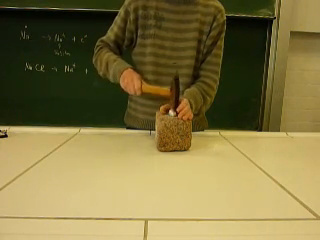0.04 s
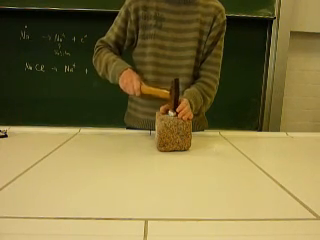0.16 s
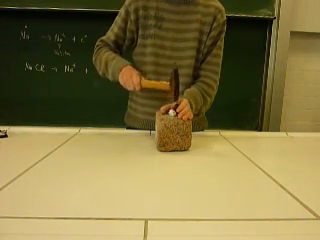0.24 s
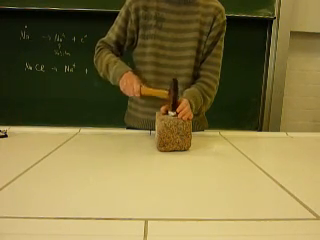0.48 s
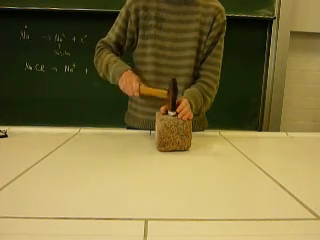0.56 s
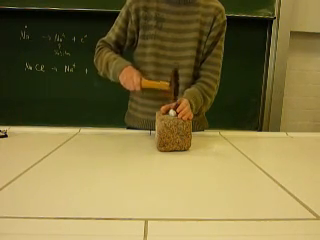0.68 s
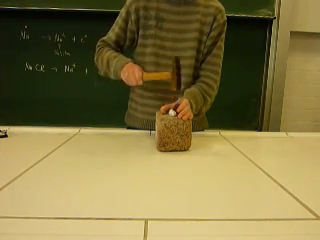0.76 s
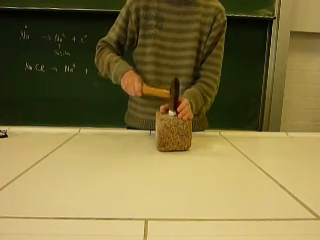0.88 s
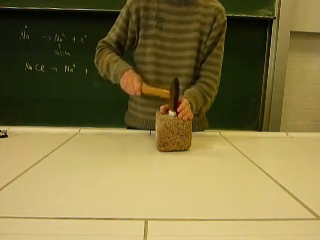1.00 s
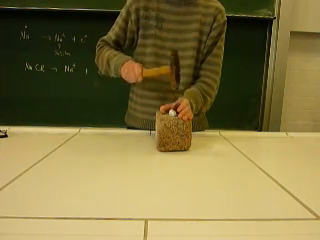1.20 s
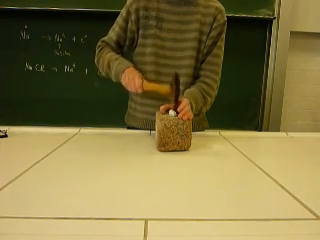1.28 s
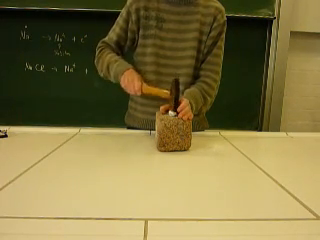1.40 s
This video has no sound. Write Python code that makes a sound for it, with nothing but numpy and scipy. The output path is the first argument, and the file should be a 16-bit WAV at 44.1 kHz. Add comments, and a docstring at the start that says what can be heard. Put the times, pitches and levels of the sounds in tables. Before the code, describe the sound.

Three hard, cracking hammer blows on stone, evenly spaced, each ringing off into a reverberant room.

```python
"""Steel hammer on marble

A steel hammer strikes a lump of marble held on a stone block on a lab bench, in a reverberant classroom.
Struck modes and noise make a bright crack, a knock of the block and a thump of the bench; the head rings faintly.
One blow falls before time zero, so only its tail is heard; three follow. Shaped noise makes reverberation and hush.
The camera's stereo microphone overloads on the blows, and its gain control ducks and recovers as the room dies away."""
import sys
import numpy as np
from scipy import signal
from scipy.io import wavfile

SR = 44100
rng = np.random.default_rng(int(sys.argv[2]) if len(sys.argv) > 2 else 0)


def log_audio(samples):
    """Write samples as a 16-bit WAV file to the path given in sys.argv[1]."""
    # one column per channel
    frames = np.atleast_2d(samples).T
    # limit to full scale, then quantise
    limited = np.clip(frames, -1, 1)
    pcm = np.round(limited * 32767).astype(np.int16)
    wavfile.write(sys.argv[1], SR, pcm)


N = 63945
LEAD = SR // 2  # samples of run-in before time zero
TIME = np.arange(N + LEAD) / SR


def from_db(db):
    """Decibels to gain."""
    return 10 ** (np.asarray(db) / 20)


def at_hz(points, hz):
    """Read a (frequency, value) table on a log-frequency axis."""
    hzs, values = np.transpose(points)
    return np.interp(np.log(hz), np.log(hzs), values)


def delayed(x, s):
    """The same sound, s seconds later."""
    return np.apply_along_axis(lambda v: np.interp(TIME - s, TIME, v, left=0, right=0), -1, x)


def decay_db(t60):
    """A steady fall of 60 dB every t60 seconds, stopped at -240 dB."""
    return -60 * np.minimum(TIME / t60, 4)


def ring(modes, length=1):
    """Struck modes die exponentially; strengths vary from blow to blow and length stretches the decays."""
    spread_db = 3.05  # standard deviation of each mode's strength
    total = 0
    for hz, db, t60 in modes:
        level_db = db + spread_db * rng.standard_normal()
        total = total + from_db(level_db + decay_db(t60 * length)) * np.sin(2 * np.pi * hz * TIME)
    return total


def crack():
    """The steel face meets the marble: fast-dying modes tick, and high-passed noise is the crushed grains."""
    # crack of steel on marble: (frequency [Hz], mean level [dB], t60 [s])
    crack_modes = [(2810, -17, 0.0095), (3510, -29, 0.0069), (5340, -27.5, 0.012), (6230, -23, 0.0065),
                   (7140, -5.5, 0.0036)]
    grit_db, grit_t60_s, grit_low_hz = -12.5, 0.022, 2580
    high_pass = signal.butter(2, grit_low_hz, "high", fs=SR, output="sos")
    grit = signal.sosfilt(high_pass, rng.standard_normal(len(TIME)))
    return ring(crack_modes) + grit * from_db(grit_db + decay_db(grit_t60_s))


def block_knock(length):
    """The stone block under the marble rings briefly in its own modes, just after the crack."""
    # modes of the stone block: (frequency [Hz], mean level [dB], t60 before stretching by length [s])
    block_modes = [(795, -20, 0.11), (988, -12, 0.048), (1283, -9.5, 0.037), (1572, -9.5, 0.026),
                   (1696, -8, 0.0095)]
    lag_s = 0.000254
    return -delayed(ring(block_modes, length), lag_s)


def bench_thump(length):
    """The bench top answers in lower modes, just after the crack."""
    # modes of the bench top: (frequency [Hz], mean level [dB], t60 before stretching by length [s])
    bench_modes = [(256, -21.5, 0.066), (339.4, -9, 0.033), (417, -17, 0.069), (577, -34, 0.09)]
    lag_s = 0.0003
    return delayed(ring(bench_modes, length), lag_s)


def blow(crack_db, knock_db, thump_db, length):
    """Crack, knock and thump reach the microphones directly, then by early reflections."""
    # reflections from ceiling and board: (delay [s], crack gain [dB], knock gain [dB], thump gain [dB])
    echoes = [(.0098, -14, -16.5, -25.5), (0.0117, -20, -14, -14)]
    bench_low_hz = 140  # below this the bench top radiates little
    left_lag_s = 0.000015
    tick = from_db(crack_db) * crack()
    knock = from_db(knock_db) * block_knock(length)
    thump = from_db(thump_db) * bench_thump(length)
    high_pass = signal.butter(1, bench_low_hz, "high", fs=SR, output="sos")
    knock, thump = signal.sosfilt(high_pass, np.array([knock, thump]))
    near = tick + knock + thump
    for s, high_db, mid_db, low_db in echoes:
        reflected = from_db(high_db) * tick + from_db(mid_db) * knock + from_db(low_db) * thump
        near = near + delayed(reflected, s)
    return np.array([delayed(near, left_lag_s), near])


def wavering_ring(hz, db, t60):
    """A long ring heard over many paths, so that its strength and phase wander."""
    waver_hz, waver_share = 9.9, 0.68  # corner of the wander; share of the ring's power that wanders
    pole = np.exp(-2 * np.pi * waver_hz / SR)
    noise = [1, 1j] @ rng.standard_normal((2, len(TIME) + LEAD))
    paths = signal.lfilter([1], [1, -2 * pole, pole * pole], noise)[LEAD:]  # drop the filter's start-up
    wander = np.sqrt(1 - waver_share) + np.sqrt(waver_share) * paths / paths.std()
    carrier = wander * np.exp(2j * np.pi * (hz * TIME + rng.random()))
    return from_db(db - 60 * TIME / t60) * carrier.real


def hammer_ring(off_centre):
    """The steel head rings on, differently at each microphone; where it lands decides which modes speak."""
    # modes of the hammer head: (frequency [Hz], level within the ring for a centred blow [dB], t60 [s],
    # change when struck fully off-centre [dB])
    hammer_modes = [(2130, -2, .6, 0), (3246, 3, .68, -14), (3321, -8, .56, 6), (4005, -9, .55, 11),
                    (4075, -3, .42, -2), (8003, -14, .45, 12)]
    hammer_db = -36
    microphones = []
    for _ in range(2):
        rings = [wavering_ring(hz, db + off_centre * change_db, t60) for hz, db, t60, change_db in hammer_modes]
        microphones.append(sum(rings))
    return from_db(hammer_db) * np.array(microphones)


def build_up(hz):
    """The room fills quickly, the bass more slowly than the treble."""
    onset_s, build_s, build_cycles = 0.0058, 0.0023, 1.2
    return 1 - np.exp(-np.maximum(TIME - onset_s, 0) / (build_s + build_cycles / hz))


def diffuse_bands():
    """Third-octave bands of stereo noise, alike in the bass and unrelated in the treble: (Hz, noise)."""
    # likeness of diffuse sound at the two microphones: (frequency [Hz], coherence [0-1])
    likeness = [(250, 0.99), (500, .98), (1000, .93), (2000, 0.73), (4000, 0.22), (8000, .1)]
    edges = 28 * 2 ** (np.arange(26) / 3)
    white = rng.standard_normal((2, 2, len(TIME)))  # neighbouring bands take turns with two noise pairs
    bands = []
    for k, (low, high) in enumerate(zip(edges, edges[1:])):
        band_pass = signal.butter(3, [low, high], "band", fs=SR, output="sos")
        mid, side = signal.sosfilt(band_pass, white[k % 2])
        hz = np.sqrt(low * high)
        alike = at_hz(likeness, hz)
        stereo = np.sqrt(1 + alike) * mid + np.sqrt(1 - alike) * side * [[1], [-1]]
        # turn the noise round so that the filter's start-up is not at the beginning
        bands.append((hz, np.roll(stereo, -LEAD // 2, axis=1)))
    return bands


def reverberation(same, treble_db):
    """The room's answer to one blow: a diffuse wash that dies band by band, and a few wavering resonances."""
    # colour of the wash before overall scaling: (frequency [Hz], relative level [dB per Hz])
    wash_colour = [(40, -36), (80, -31), (125, -7.5), (200, 1), (350, 7.5), (600, 6.5), (1000, 4.5),
                   (1600, 1), (2300, -12), (3200, -14), (4000, -14), (5000, -26), (6500, -13.5),
                   (8000, -35.5)]
    # decay of the wash: (frequency [Hz], t60 [s])
    wash_t60 = [(100, 0.67), (400, 0.69), (1000, 0.56), (2000, 0.53), (4000, 0.53), (7500, 0.59)]
    # room resonances, wavering tones within the wash: (frequency [Hz], level [dB], t60 [s])
    room_modes = [(238.4, -29, 0.45), (336.3, -29, 0.75), (440, -49, 0.58), (510.3, -27, 0.68),
                  (617, -22.5, 0.44), (659, -26, 0.53), (881, -35, 0.58)]
    wash_db = -17
    same_share = 0.63  # share of the wash's power that repeats from blow to blow
    wash, steady = 0, 0
    for (hz, common), (_, own) in zip(same, diffuse_bands()):
        mixed = np.sqrt(same_share) * common + np.sqrt(1 - same_share) * own
        band = from_db(at_hz(wash_colour, hz)) * mixed
        steady = steady + band  # the wash without build-up or decay sets its level
        treble_share = at_hz([(2500, 0.16), (6000, 0.78)], hz)
        fade_db = treble_db * treble_share - 60 * TIME / at_hz(wash_t60, hz)
        wash = wash + band * build_up(hz) * from_db(fade_db)
    resonances = sum(build_up(hz) * wavering_ring(hz, db, t60) for hz, db, t60 in room_modes)
    return from_db(wash_db) * wash / steady.std() + resonances


def room_noise():
    """A faint steady hush: diffuse noise bands weighted to the colour of the room."""
    # colour of the hush before overall scaling: (frequency [Hz], relative level [dB per Hz])
    hush_colour = [(30, -14.5), (100, 2), (400, 5.5), (1000, 3.5), (2500, -3.5), (8000, -15)]
    hush_db = -60.5  # RMS level ahead of the stereo balance and gain control
    hush = sum(from_db(at_hz(hush_colour, hz)) * band for hz, band in diffuse_bands())
    return from_db(hush_db) * hush / hush.std()


def scene():
    """The blows in the classroom over its hush, with the run-in ahead of them cut off."""
    # hammer blows: (time [s], force [dB], crack [dB], knock [dB], thump [dB], ring length [factor],
    # reverberation [dB], reverberant treble before weighting by band [dB], off-centre [0-1])
    blows = [(-0.185, -7, -3, 2, 0, 2.4, 1, 0, 0.54), (0.2286, 0, -2.5, 0.5, 0.5, 1.4, 0.44, -3, 0.14),
             (0.6378, 0.5, 0, 0, -2, 1.25, 3, 0, 0.24), (1.0508, 1, 1, -4, 1.5, 0.94, 0.3, 5.5, 0.78)]
    pan_db = 0.07  # left raised and right lowered by this much
    same = diffuse_bands()
    out = room_noise()
    for s, force_db, crack_db, knock_db, thump_db, length, room_db, treble_db, off_centre in blows:
        sound = blow(crack_db, knock_db, thump_db, length) + hammer_ring(off_centre)
        sound = sound + from_db(room_db) * reverberation(same, treble_db)
        start_s = round(s * SR + LEAD) / SR  # on a whole sample
        out = out + from_db(force_db) * delayed(sound, start_s)
    return out[:, LEAD:] * from_db([[pan_db], [-pan_db]])


def record(dry):
    """Gain control ducks after each peak and recovers; peaks overload; the top is cut."""
    threshold_db, release_db_per_s, attack_s = -3.5, 53, 0.02
    ceiling_db, cutoff_hz = -0.8, 8700  # soft overload ceiling; 75 dB down from the cutoff upwards
    peak_db = 20 * np.log10(np.abs(dry).max(axis=0) + 1e-9)  # the louder channel steers both
    over_db = np.maximum(peak_db - threshold_db, 0)
    ramp = release_db_per_s * TIME[:N]
    held_db = np.maximum.accumulate(over_db + ramp) - ramp  # hold each peak, releasing along the ramp
    pole = np.exp(-1 / (attack_s * SR))
    duck_db = signal.lfilter([1 - pole], [1, -pole], held_db)
    x = dry * from_db(-duck_db)
    x = x / (1 + (x / from_db(ceiling_db)) ** 6) ** (1 / 6)
    return signal.sosfilt(signal.cheby2(20, 75, cutoff_hz, fs=SR, output="sos"), x)


dry = scene()
out = record(dry)
log_audio(out)
```